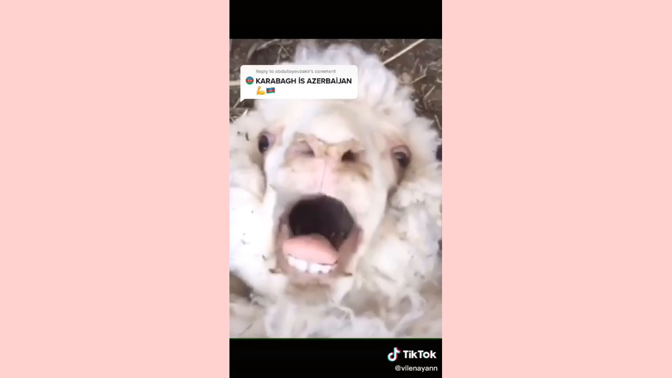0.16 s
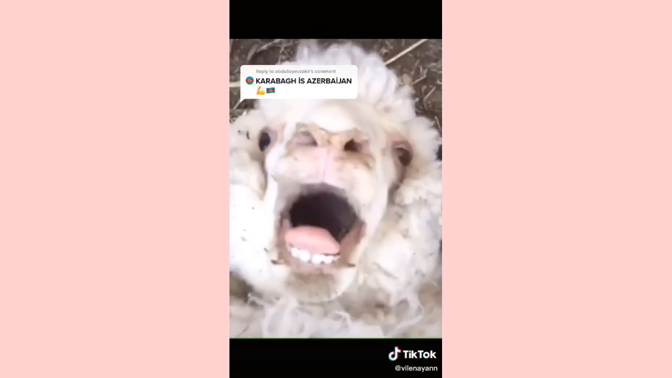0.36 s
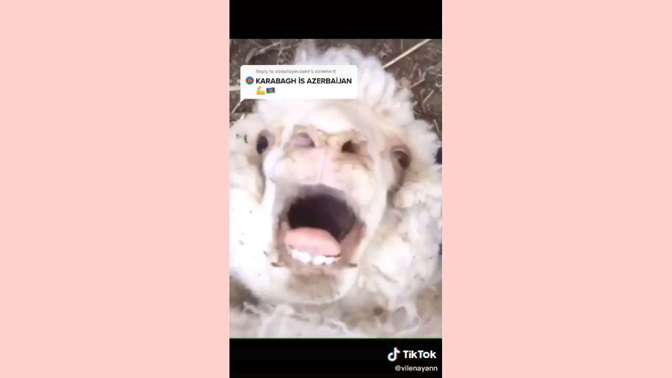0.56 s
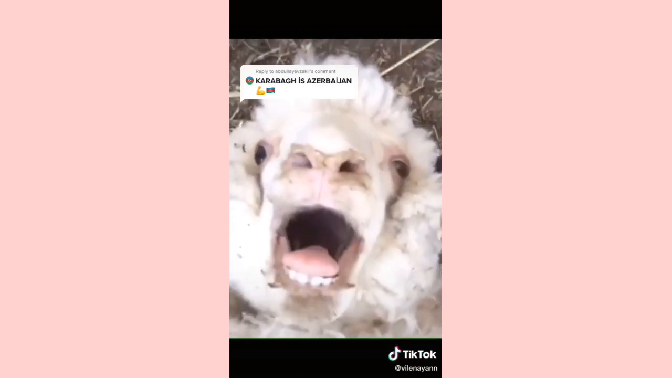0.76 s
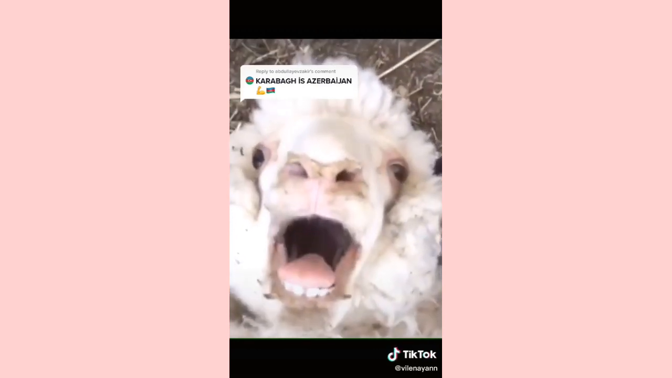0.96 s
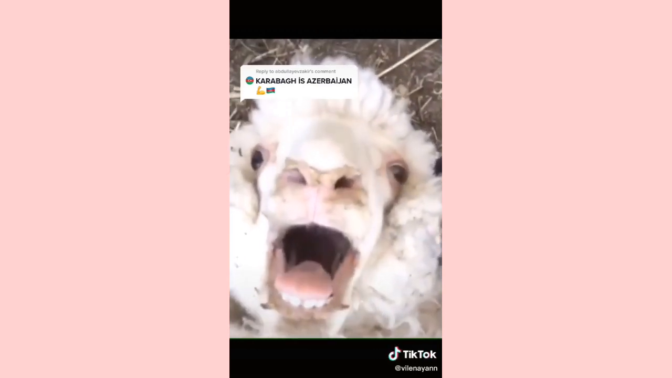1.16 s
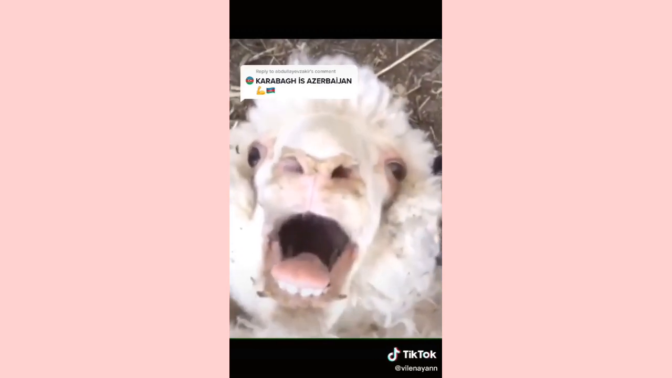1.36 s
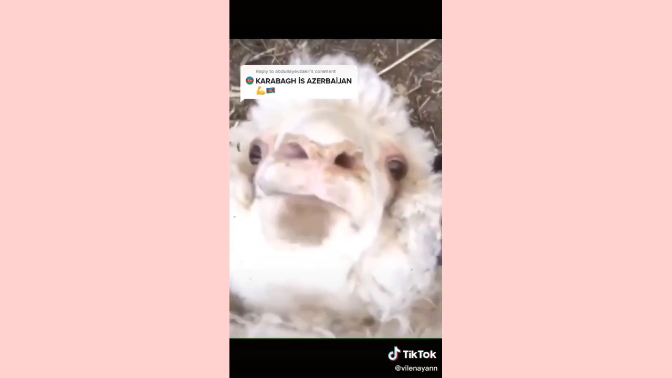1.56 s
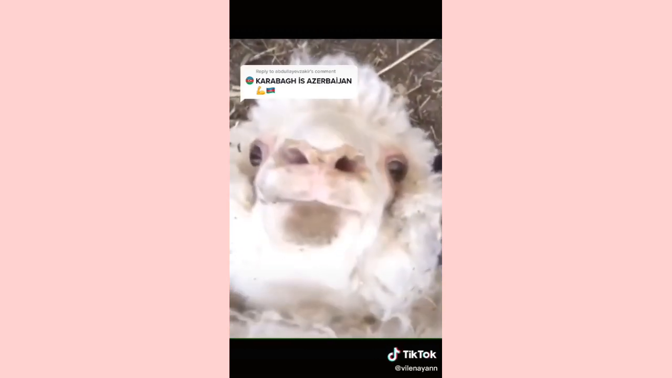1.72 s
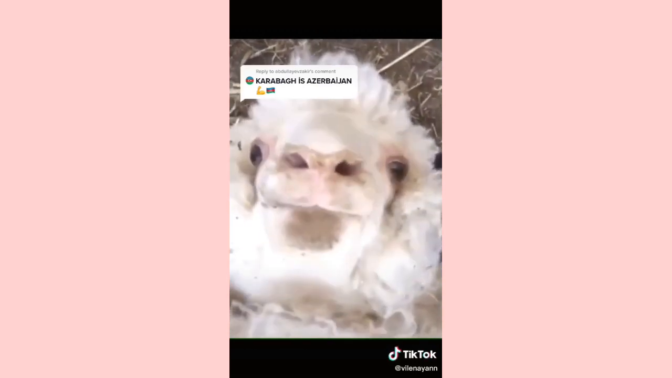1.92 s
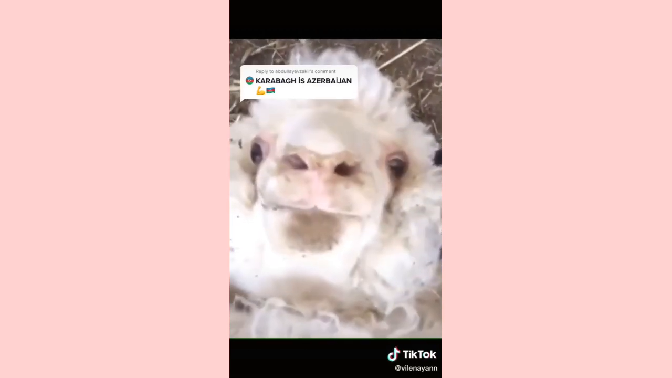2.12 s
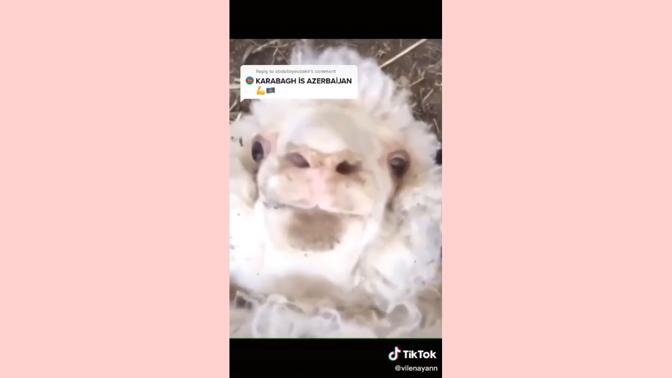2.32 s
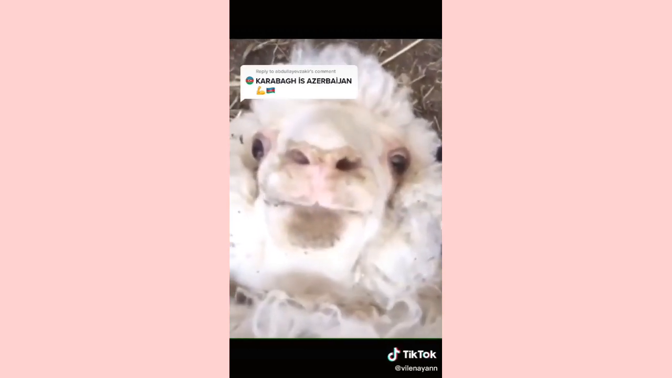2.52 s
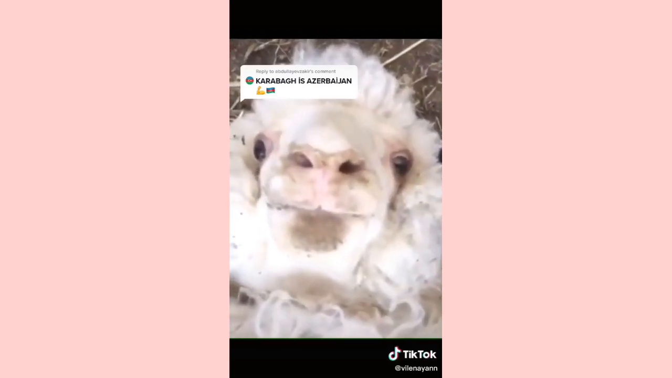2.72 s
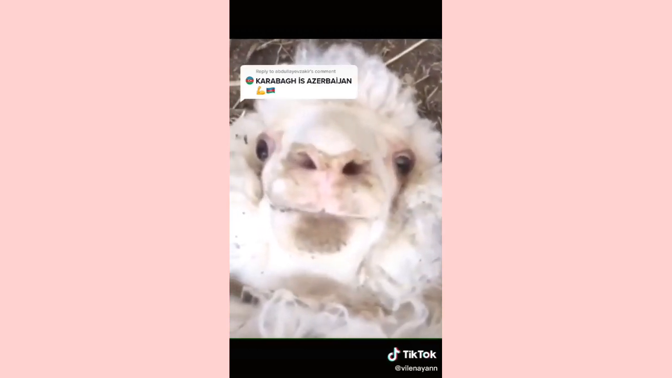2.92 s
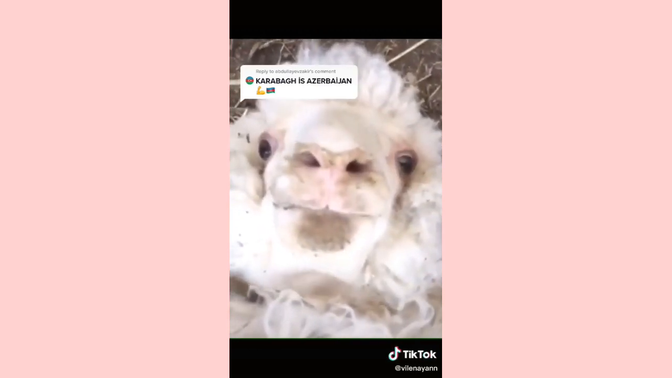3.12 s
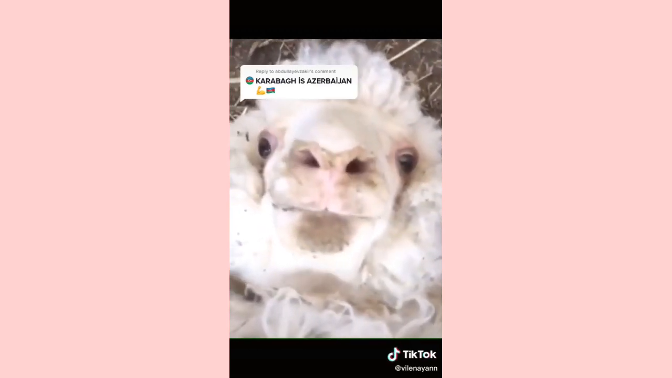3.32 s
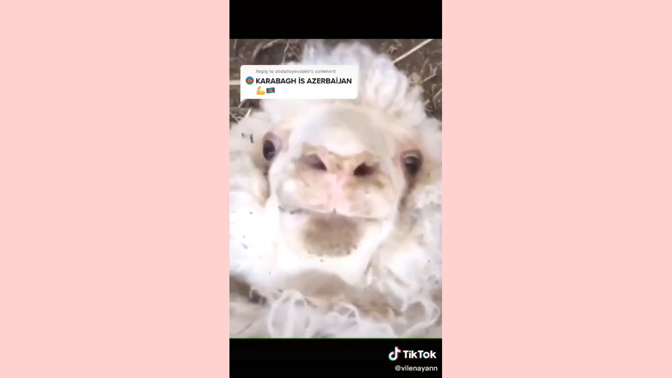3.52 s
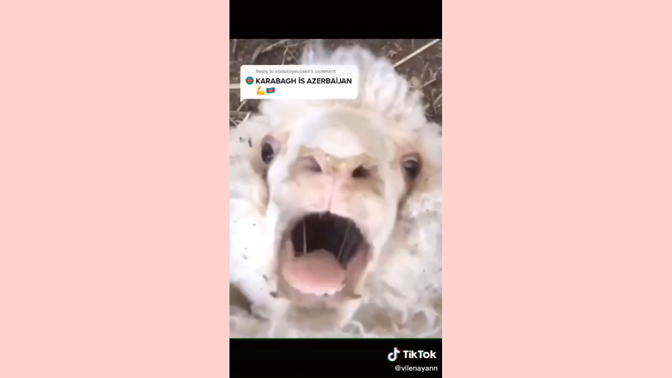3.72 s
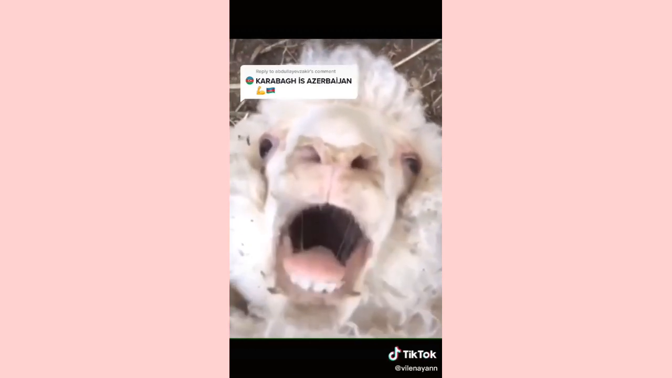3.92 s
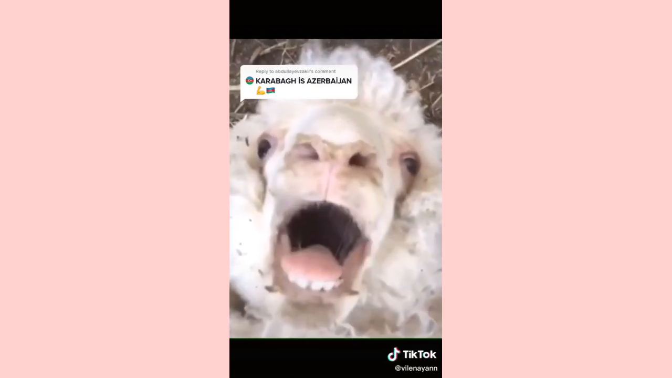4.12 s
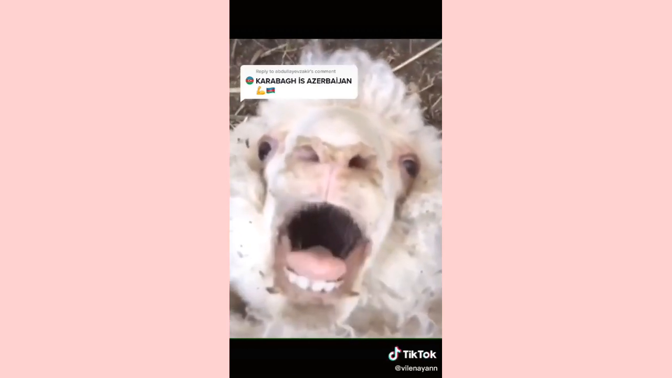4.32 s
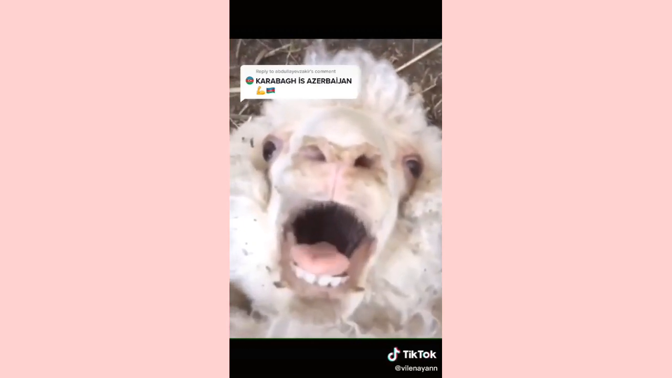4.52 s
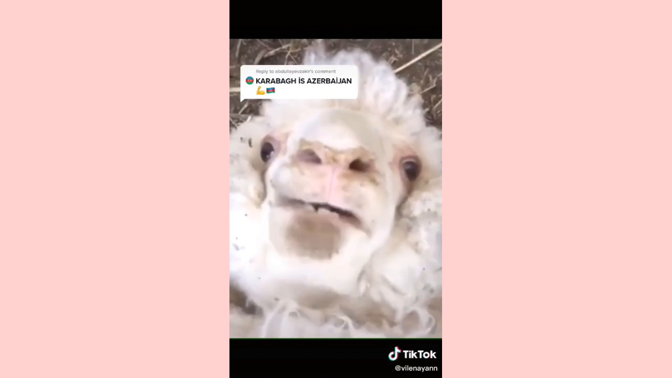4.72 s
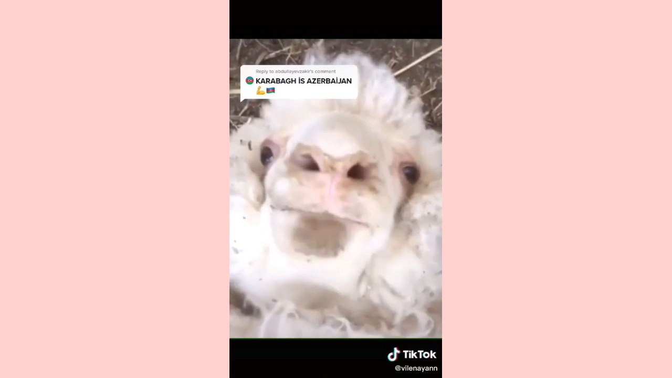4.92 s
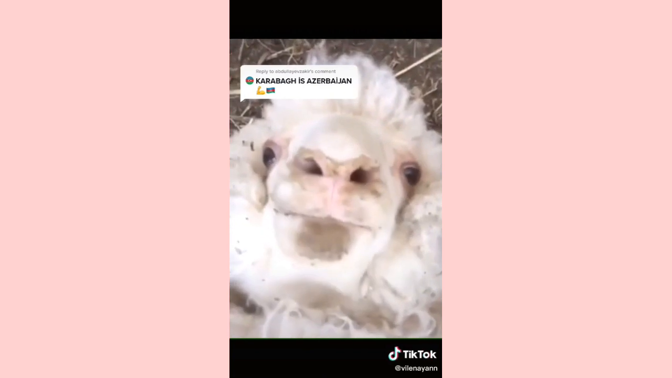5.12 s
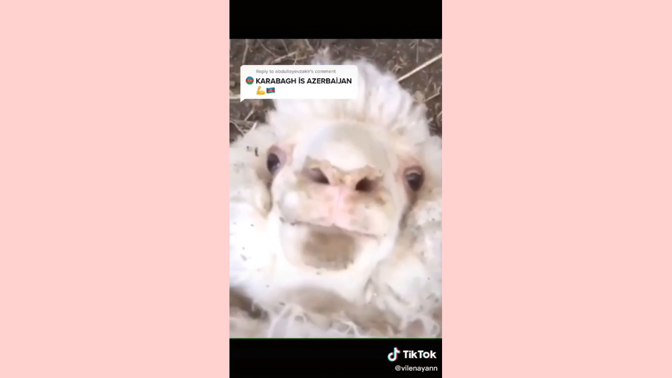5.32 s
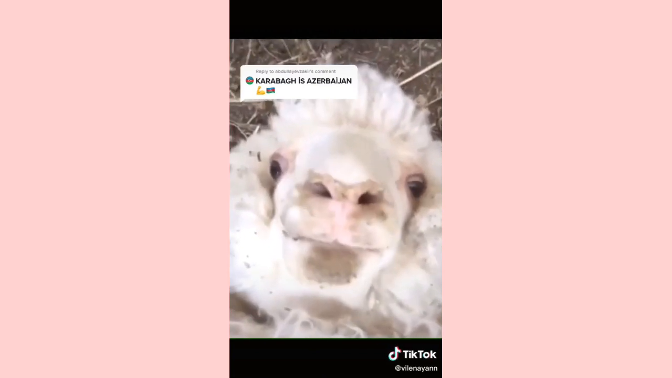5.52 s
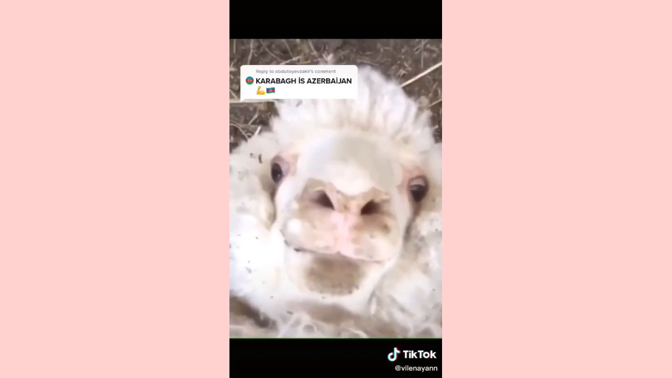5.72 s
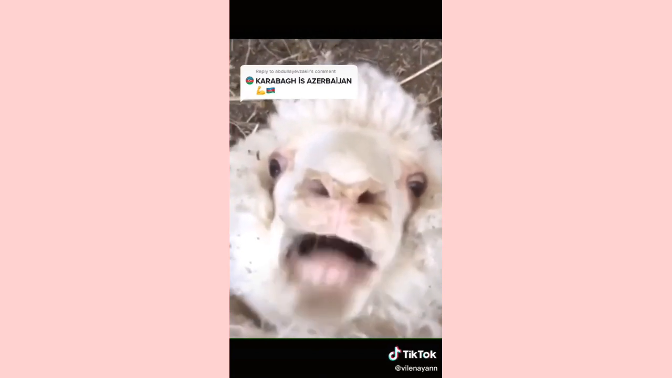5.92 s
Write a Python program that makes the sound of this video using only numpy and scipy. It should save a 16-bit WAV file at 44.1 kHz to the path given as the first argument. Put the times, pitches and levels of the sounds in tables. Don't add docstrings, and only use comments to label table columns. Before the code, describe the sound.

Two harsh, nasal, steady sheep baas very close up, separated by faint nostril puffs and wet lip ticks, with a third just starting.

```python
import sys
import numpy as np
from scipy import signal
from scipy.fft import rfft, irfft
from scipy.io import wavfile
from scipy.ndimage import uniform_filter1d

SR = 44100
rng = np.random.default_rng(int(sys.argv[2]) if len(sys.argv) > 2 else 0)


def volts_from_db(level):
    exponent = np.asarray(level, float) / 20
    return 10 ** exponent


def wav_out(sig):
    wavfile.write(sys.argv[1], SR, np.round(np.clip(np.atleast_2d(sig).T, -1, 1) * 32767).astype(np.int16))


N = 262836

# t/s, roughness/0-1
ROUGHNESS = [(0, .5), (.06, .4), (.09, .2), (.23, .2), (.28, .27), (.43, .18), (.53, .11), (1.4, .11),
             (1.52, .3), (3.6, 1), (3.82, .8), (3.92, .26), (4.0, .1), (4.3, .1), (4.5, .18), (4.6, .22),
             (4.66, .4)]
# f/Hz, width/Hz, level/dB
CREAKING_TRACT = [
    [(947, 110, -0.5), (1290, 220, -4.5)],
    [(1788, 120, 0)],
    [(2200, 360, -2), (2690, 300, 1.7), (3030, 300, -1.5)],
    [(4160, 320, -1), (4460, 810, 0), (5800, 920, -5.5)],
    [(7500, 250, -1), (8200, 300, -11.5), (9600, 300, -18)],
]
SIDE_POCKET_HZ, SIDE_POCKET_WIDTH_HZ = 3750, 140
CHEST_HZ = (394, 650)


def in_time(rows):
    s, *columns = np.transpose(rows)
    return [np.interp(np.arange(N) / SR, s, c) for c in columns]


def rms_one(x):
    return x / np.sqrt(np.mean(x ** 2) + 1e-20)


def evened(x, span_s):
    size = int(span_s * SR)
    power = uniform_filter1d(uniform_filter1d(x ** 2, size), size)
    return x / np.sqrt(power + 1e-12)


def passed(x, hz, kind, order):
    return signal.sosfilt(signal.butter(order, hz, kind, fs=SR, output="sos"), x)


def resonances(x, modes, wander_db=0):
    out = 0
    for k, (hz, width, level_db) in enumerate(modes):
        r = np.exp(-np.pi * width / SR)
        wander = np.interp(np.arange(N), np.linspace(0, N, 60), rng.standard_normal(60))
        poles = [1, -2 * r * np.cos(2 * np.pi * hz / SR), r * r]
        ring = signal.lfilter([1 - r, 0, r - 1], poles, x)
        out = out + (-1) ** k * volts_from_db(level_db + wander_db * wander) * ring
    return out


def swells(rows):
    t = np.arange(N) / SR
    return [volts_from_db(db - 20 * np.maximum((s - t) / rise_s, (t - s) / fall_s)) for s, db, rise_s, fall_s in rows]


def hum():
    # f/Hz, density/dB
    spectrum = [(20, -35.5), (45, 0.5), (100, 0.5), (250, -11.5), (650, -14), (1500, -16), (2400, -21),
                (3000, -16), (3600, -25), (5000, -33), (8000, -38), (10000, -46.5), (12000, -40),
                (15500, -35)]
    floor_hz, floor_db = np.transpose(spectrum)
    hz = np.arange(N // 2 + 1) * SR / N + 1
    colour = volts_from_db(np.interp(np.log(hz), np.log(floor_hz), floor_db))
    return volts_from_db(-67) * rms_one(irfft(rfft(rng.standard_normal(N)) * colour, N))


def pen(x):
    t60_s, echo_db, first_wall_s = .17, -22, .006
    t = np.arange(int(.4 * SR)) / SR
    tail = rng.standard_normal(len(t)) * volts_from_db(-60 * t / t60_s) * (t > first_wall_s)
    return volts_from_db(echo_db) * signal.fftconvolve(x, tail / np.sqrt(np.sum(tail ** 2)))[:N]


def snuffle():
    # peak t/s, peak level/dB, rise/s, fall/s, upper hiss re peak/dB
    sniffs = [(1.546, -56, .012, 0.069, -19), (1.63, -63.5, 0.055, 0.034, -0.5),
              (1.742, -52.5, 0.014, 0.095, -11), (1.921, -66, 0.14, 0.22, -1),
              (2.1, -62.5, 0.21, 0.25, -8.5), (2.38, -73, 0.16, 0.41, -6.5),
              (2.64, -68.5, .05, 0.22, -16.5), (2.881, -64, 0.11, 0.37, -10.5),
              (3.038, -56.5, 0.054, .03, -10.5), (3.21, -57, 0.045, 0.15, -4), (3.47, -71, .06, 0.024, -30),
              (3.55, -65, 0.054, .015, -11.5), (4.679, -62, 0.011, .08, -30),
              (5.177, -61.5, 0.34, 0.048, -13.5), (5.266, -58.5, 0.037, 0.062, -13),
              (5.352, -59.5, 0.012, 0.075, -13), (5.462, -52.5, 0.025, 0.042, -27),
              (5.718, -61.5, 0.47, 0.76, -23)]
    # peak t/s, peak level/dB, rise/s, fall/s
    whistles = [
        (1.79, -62, 0.049, 0.26),
        (1.965, -61.5, .3, .03),
    ]
    # f/Hz, width/Hz, level/dB
    nostril_modes = [(1794, 120, -4.5), (2320, 160, -8.5), (2956, 130, 0.5), (3190, 200, -5.5)]
    hiss_modes = [(4200, 190, 3.5), (5000, 260, 0), (5800, 550, -8.5)]
    whistle_modes = [(1284, 220, -2.5), (1560, 230, -10)]
    air = rng.standard_normal((3, N))
    puffs = swells([row[:4] for row in sniffs])
    breath = sum(puffs)
    hiss = sum(puff * volts_from_db(row[4]) for puff, row in zip(puffs, sniffs))
    whistle = volts_from_db(-12.5) * breath + sum(swells(whistles))
    out = breath * rms_one(resonances(air[0], nostril_modes, wander_db=2.0))
    out += hiss * rms_one(resonances(air[1], hiss_modes, wander_db=4.0))
    return out + whistle * rms_one(resonances(air[2], whistle_modes))


def smacks():
    # t/s, peak level/dB, first f/Hz, last f/Hz, length/s
    parting_lips = [
        (2.635, -53.5, 900, 866, 0.01),
        (3.297, -50.5, 2200, 464, 0.0087),
        (3.385, -58, 357, 430, 0.016),
        (3.47, -53, 2300, 1474, 0.00594),
        (4.826, -56.5, 306.3, 200, 0.0054),
    ]
    break_db, onset_s = 4.5, 0.00037
    out, t = np.zeros(N), np.arange(int(.08 * SR)) / SR
    for s, level_db, first_hz, last_hz, length in parting_lips:
        pitch = last_hz + (first_hz - last_hz) * np.exp(-t / length * 1.5)
        tear = uniform_filter1d(rng.standard_normal(len(t)), size=70)
        tear = rms_one(uniform_filter1d(tear, size=70))
        ring = np.sin(2 * np.pi * np.cumsum(pitch) / SR)
        envelope = np.exp(-t / length) * (1 - np.exp(-t / onset_s))
        start = round(s * SR)
        out[start:start + len(t)] += volts_from_db(level_db + break_db * tear) * ring * envelope
    return out


def buzz(voice):
    hiss = rms_one(passed(rng.standard_normal(N), (11800, 14500), "band", order=3))
    return volts_from_db(-84) * uniform_filter1d(voice ** 2, size=40) * 30 * hiss


def cavities(source, tract, front_sign):
    front_edge_hz = 2720
    nose_edge_hz, teeth_edges_hz = 5640, (7200, 8770)
    nose_hiss, teeth_hiss = .032, .055
    mouth_lag = 71
    hiss = rng.standard_normal(N) * np.sqrt(uniform_filter1d(source ** 2, size=2000) + 1e-12) * 14
    throat, mouth, front = [passed(resonances(source, modes, wander_db=7.0), front_edge_hz, "low", order=4)
                            for modes in tract[:3]]
    nose = resonances(source + nose_hiss * hiss, tract[3], wander_db=3.0)
    nose = passed(nose, [SIDE_POCKET_HZ, nose_edge_hz], "band", order=2)
    teeth = passed(resonances(source + teeth_hiss * hiss, tract[4]), teeth_edges_hz, "band", order=2)
    return [throat, -np.pad(mouth, (mouth_lag, 0))[:N], front_sign * front, nose, teeth]


def radiated(voice):
    notch = signal.iirnotch(SIDE_POCKET_HZ, SIDE_POCKET_HZ / SIDE_POCKET_WIDTH_HZ, SR)
    return passed(signal.lfilter(*notch, voice), 655, "high", order=4)


def slips():
    # t/s, level/dB, length/s
    fold_slips = [
        (3.59, -56.5, 0.018),
        (3.609, -24.5, 0.0047),
        (3.614, -17.5, 0.0033),
        (3.623, -29.5, 0.009),
        (3.638, -24, 0.0053),
        (5.916, -38, 0.0061),
        (5.929, -39, 0.0087),
        (5.938, -21, 0.0055),
        (5.953, -15, 0.0088),
    ]
    cavity_db = [-11.5, -3, 5, -13, -35.5]
    puffs, t = np.zeros(N + SR), np.arange(int(.04 * SR)) / SR
    for s, level_db, length in fold_slips:
        start = round(s * SR)
        puffs[start:start + len(t)] += volts_from_db(level_db) * rng.standard_normal(len(t)) * np.exp(-t / length)
    puffs = puffs[:N] + 1e-9 * rng.standard_normal(N)
    rung = cavities(puffs, CREAKING_TRACT, 1)
    mouth = radiated(sum(volts_from_db(level_db) * rms_one(x) for x, level_db in zip(rung, cavity_db)))
    chest = volts_from_db(-22.5) * rms_one(passed(puffs, CHEST_HZ, "band", order=2))
    return (mouth + chest) * np.std(puffs)


def folds(pitch_hz, jitter, shimmer_db, breath):
    rough, = in_time(ROUGHNESS)
    cycles = np.cumsum(pitch_hz) / SR
    at = np.interp(np.arange(1, int(cycles[-1])), cycles, np.arange(N))
    draws = np.clip(rng.standard_normal((2000, 2)), -1.7, 1.7)[:len(at)]
    here = at.astype(int)
    late = jitter * rough[here] ** 2.3 * draws[:, 0] * SR / pitch_hz[here]
    at = np.clip(at + late, 20, N - 20)
    taps = np.arange(-16, 17)
    offset = taps - (at % 1)[:, None]
    shape = np.sinc(.8 * offset) * np.cos(np.pi * offset / 36) ** 2
    strength = volts_from_db(shimmer_db * rough[here] ** 2.0 * draws[:, 1])
    pulses = np.zeros(N)
    np.add.at(pulses, at.astype(int)[:, None] + taps, shape * strength[:, None])
    open_phase = signal.lfilter([1], [1, -.99], np.abs(pulses))
    air = passed(rng.standard_normal(N), 1850, "high", order=2)
    return pulses + breath * np.minimum(rough, .7) * (.5 + open_phase) * air


def bleat(rows, give_out, clear_db, tract, front_sign):
    hoarse_db = [15.5, 12.5, 11]
    shut_db = [12, 8.5, 3.5]
    closing_s = 0.017
    teeth_re_nose_db, teeth_follow, usual_db = -14.5, .9, -19
    chest_db, belly_db, chest_creak_db = -29, -42, 3
    chest_shut_db = 13

    t = np.arange(N) / SR
    end, sag_hz, lead_s, fade_db = give_out
    pitch_hz, mouth_db = in_time(rows)
    pitch_hz = pitch_hz - sag_hz * np.exp(np.minimum(t - end, closing_s) / lead_s)
    teeth_db = clear_db[2] + teeth_re_nose_db + teeth_follow * (mouth_db - usual_db)
    mouth_db = mouth_db - fade_db * np.maximum(t - end, 0)
    rough, = in_time(ROUGHNESS)
    shut = np.clip((t - end) / closing_s, 0, 1)
    throat_db, front_db, nose_db = [db + hoarse * rough + closed * shut
                                    for db, hoarse, closed in zip(clear_db, hoarse_db, shut_db)]

    source = folds(pitch_hz, jitter=.2, shimmer_db=6.5, breath=.09)
    creak = np.clip((rough - .3) / .5, 0, 1)
    levels_db = [throat_db, 0, front_db, nose_db, teeth_db]
    voice = 0
    for clear, tight, level_db in zip(cavities(source, tract, front_sign),
                                      cavities(source, CREAKING_TRACT, 1), levels_db):
        blend = (1 - creak) * evened(clear, .04) + creak * evened(tight, 0.013)
        voice = voice + volts_from_db(level_db) * blend
    voice = radiated(voice)

    chest = evened(passed(source, CHEST_HZ, "band", order=2), 0.054)
    chest = volts_from_db(chest_db + chest_creak_db * creak + chest_shut_db * shut) * chest
    belly = evened(passed(source, (120, 240), "band", order=2), 0.054)
    belly = volts_from_db(belly_db + chest_creak_db * creak) * belly
    onset = np.clip((t - rows[0][0]) / .012 + 1, 0, 1)
    return (voice + chest + belly) * volts_from_db(mouth_db) * onset


def first_bleat():
    # t/s, pitch f/Hz, level/dB
    effort = [
        (0, 193, -13.5),
        (.03, 193.6, -21.5),
        (.09, 191, -14.5),
        (.25, 188.3, -17),
        (.47, 186.2, -18.5),
        (.674, 182.2, -20.5),
        (.942, 178.8, -20.5),
        (1.12, 184.6, -20),
        (1.3, 186.2, -20),
    ]
    # f/Hz, width/Hz, level/dB
    open_tract = [
        [(907, 31, 16), (1204, 1600, -13.5)],
        [(1886, 92, 1)],
        [(2300, 31, 15.5), (2796, 380, 8.5), (3222, 73, 9)],
        [(4330, 550, 5), (5300, 650, 2), (6080, 900, 0)],
        [(7810, 140, -2), (8570, 83, -11.5), (9400, 690, -11)],
    ]
    give_out = (1.4706, 19, .055, 765)   # t/s, pitch sag/Hz, sag lead/s, fade/dB per s
    clear_db = [-14, -5, -23.5]
    return bleat(effort, give_out, clear_db, open_tract, 1)


def second_bleat():
    # t/s, pitch f/Hz, level/dB
    effort = [
        (3.655, 171.2, -25),
        (3.735, 169.4, -23),
        (3.88, 169.8, -19.5),
        (3.91, 176, -16),
        (4.092, 178.8, -15),
        (4.23, 177, -15),
        (4.312, 176.1, -18),
        (4.462, 172.5, -20),
        (4.59, 170.8, -23.5),
    ]
    # f/Hz, width/Hz, level/dB
    open_tract = [
        [(931, 88, 15), (1370, 100, 0)],
        [(1898, 120, 0)],
        [(2392, 98, -8), (2600, 91, 0.94), (3089, 160, 0)],
        [(4050, 1200, 5.5), (5100, 540, -20), (5500, 330, -9)],
        [(7770, 120, -2), (8430, 100, -7), (9750, 150, -6)],
    ]
    give_out = (4.6, 11, 0.057, 780)   # t/s, pitch sag/Hz, sag lead/s, fade/dB per s
    clear_db = [-18, -4, -22]
    return bleat(effort, give_out, clear_db, open_tract, -1)


def scene():
    voice = first_bleat() + second_bleat() + slips()
    voice = passed(1.3 * np.tanh(voice / 1.3), 10000, "low", order=8)
    return (voice + pen(voice) + buzz(voice) + snuffle() + smacks() + hum())[None]


def low_pass(x):
    return signal.sosfilt(signal.butter(12, 15525, fs=SR, output="sos"), x)


def record(dry):
    mix = 2.41 * np.tanh(dry / 2.458)
    return low_pass(mix)


dry = scene()
out = record(dry)
wav_out(out)
```